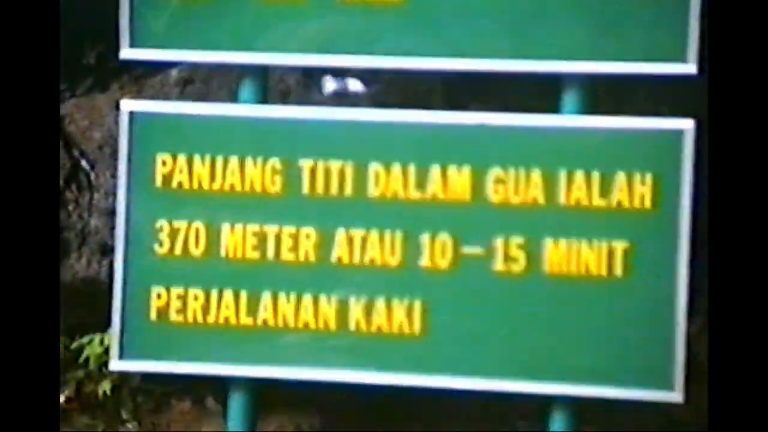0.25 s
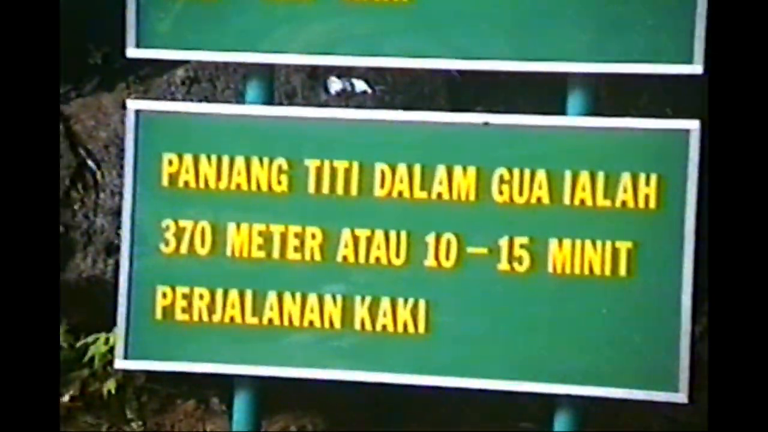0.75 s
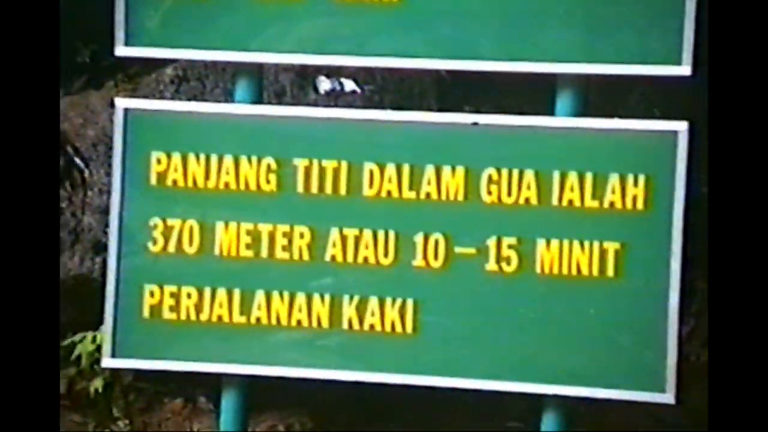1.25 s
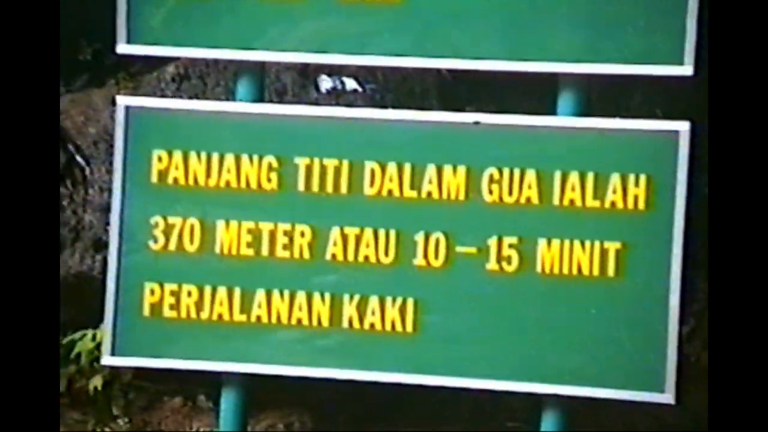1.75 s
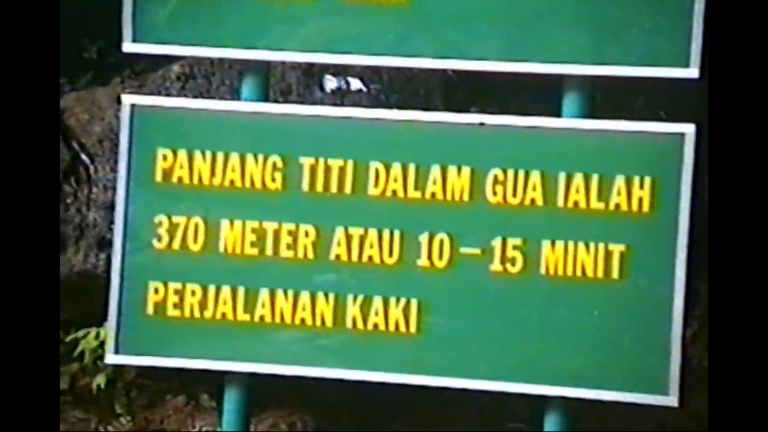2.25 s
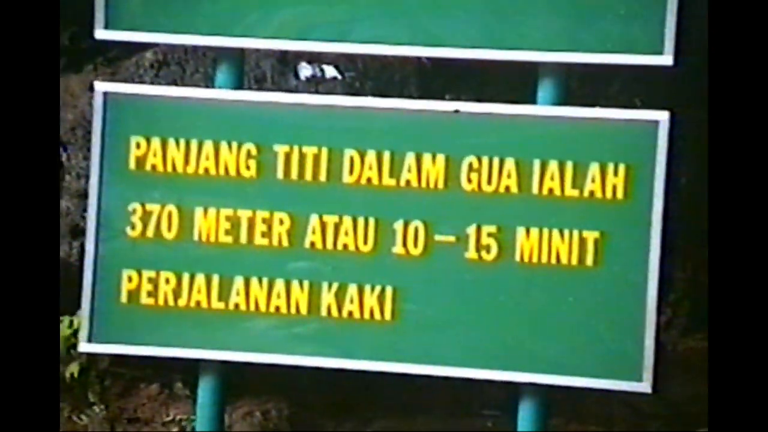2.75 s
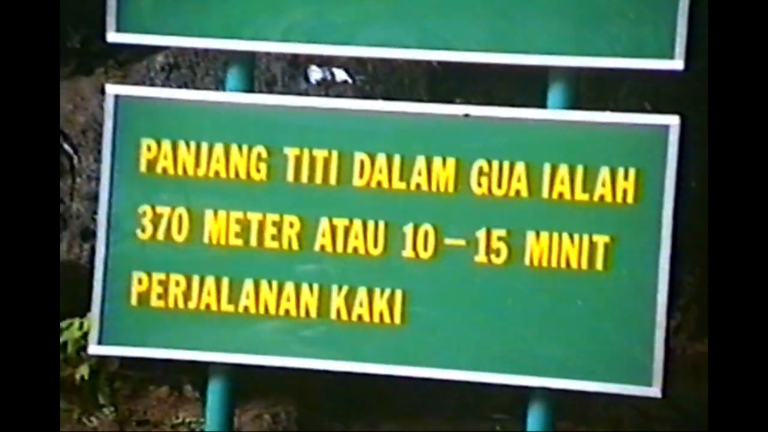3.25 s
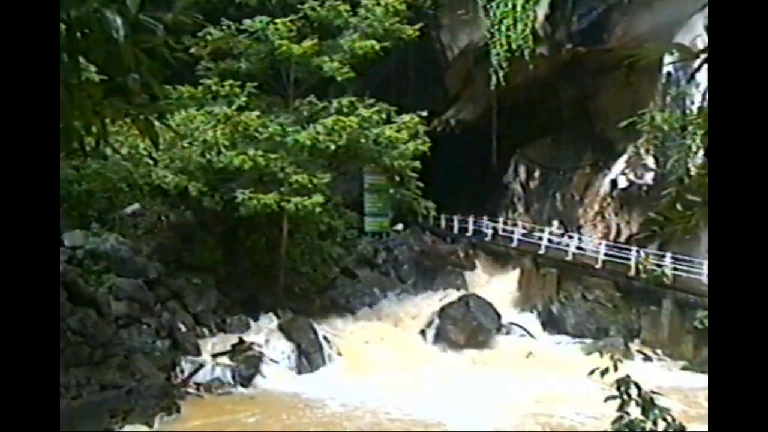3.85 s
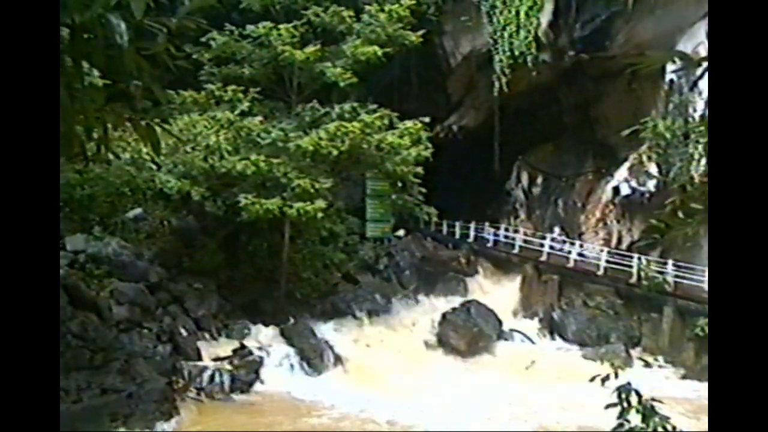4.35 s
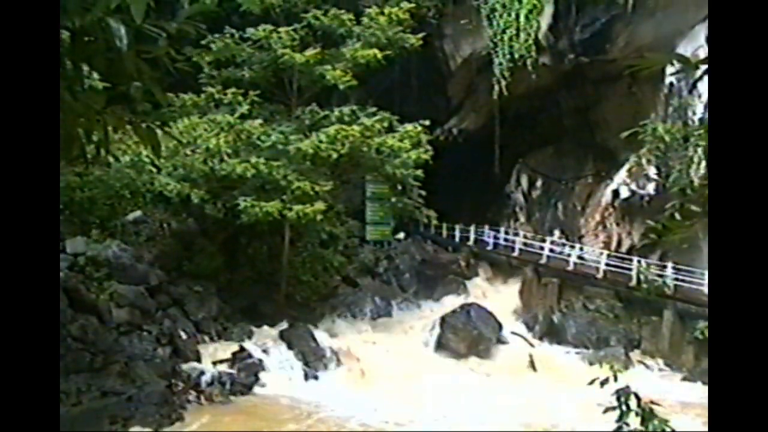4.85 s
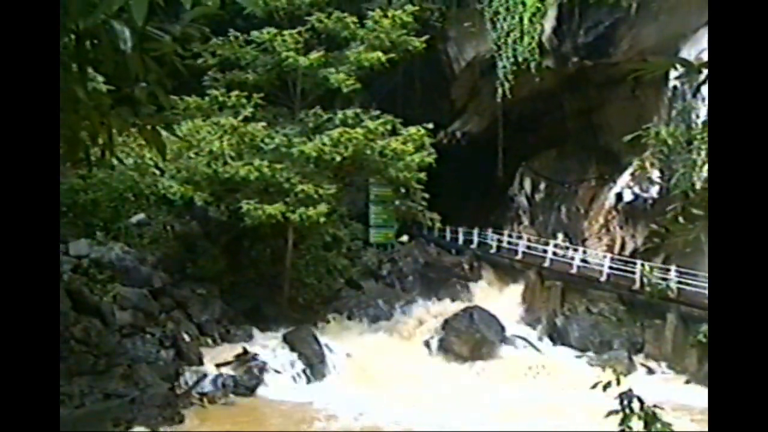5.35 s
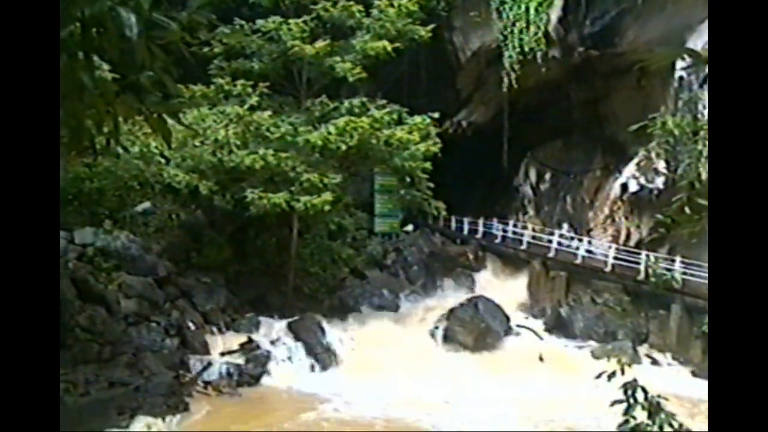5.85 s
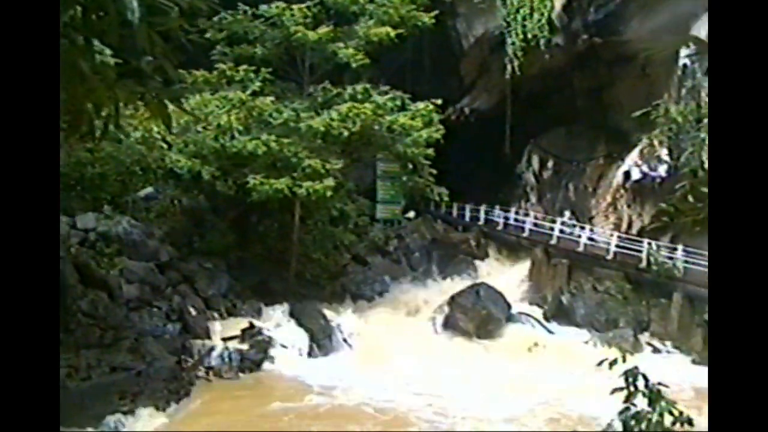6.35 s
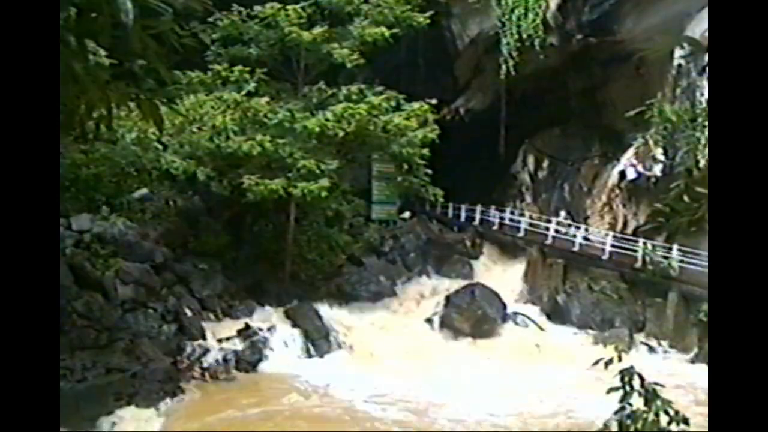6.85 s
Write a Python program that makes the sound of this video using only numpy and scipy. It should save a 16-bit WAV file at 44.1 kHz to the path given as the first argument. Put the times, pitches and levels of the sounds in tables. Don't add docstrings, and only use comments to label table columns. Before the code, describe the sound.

A flooded river roars dark and heavy over rocks, steady and distorted, then shifts near four seconds to a slightly weaker, brighter, splashier rush.

```python
import sys
import numpy as np
from scipy import signal
from scipy.fft import rfft, irfft, next_fast_len
from scipy.io import wavfile
from scipy.ndimage import uniform_filter1d, map_coordinates

SR = 44100
rng = np.random.default_rng(int(sys.argv[2]) if len(sys.argv) > 2 else 0)


def to_wav(sig):
    pcm = np.clip(np.atleast_2d(sig), -1, 1) * 32767
    pcm = np.round(pcm).astype(np.int16)
    wavfile.write(sys.argv[1], SR, pcm.T)


def natural_amplitude(level_db):
    exponent = np.asarray(level_db, float) / 20
    return 10 ** exponent


N = 312669

# [f/Hz, density/dB per Hz]
MOUTH_SPECTRUM = [(30, -59), (100, -11.5), (200, -2.5), (260, -3.5), (305, 1), (360, -1.5), (450, -0.5),
                  (600, -6.5), (1200, -11.5), (1900, -18.5), (3500, -30.5), (8000, -60)]
# [f/Hz, density/dB per Hz]
BANK_SPECTRUM = [(30, -45), (100, -12), (180, -2.5), (260, -1.5), (450, -4), (650, -8), (950, -8.5),
                 (1600, -17.5), (3500, -34), (8000, -51)]
# [f/Hz, density/dB per Hz]
SPRAY_SPECTRUM = [(600, -51), (1500, 0), (3000, 0.5), (6000, -3.5), (9000, -9.5), (16000, -14.5)]
# [t/s, plunge level/dB, extra churn level/dB, extra spray level/dB]
SURGES = [(0, 1.7, -2.2, -0.8), (.4, 0.5, 0.5, 0.5), (.8, 0.5, -1, 0), (1.2, 0.2, 1, 0.5),
          (1.65, -0.3, 0.1, -0.5), (2.15, -0.2, 0.5, 0.5), (2.4, .5, -1.3, 1), (2.7, -0.6, 0.6, -0.5),
          (3.15, 0.8, -2, -0.2), (3.45, -1.1, 2, 0), (3.75, -0.5, 1.9, 0), (4.1, 1, -1.1, -0.5),
          (4.7, 0.9, -0.5, 0), (5.2, -0.3, -.5, -0.5), (5.9, 0, .5, 0), (6.15, 0.5, -1.7, -0.8),
          (6.4, -0.7, 1.5, 0), (7.09, 1, -1, 0)]
# [f/Hz, gain/dB]
CHURN_BAND = [(450, -40), (700, 0), (2500, 0), (4000, -40)]
# [t/s, first sag/dB, second sag/dB]
SAG_GROUPS = [(.159, -.65, -.35), (.53, -.75, -.35), (2.132, -.85, -.9), (3.386, -.45, -.35),
              (3.99, -1.1, -.9), (4.524, -1.2, -1), (4.942, -.5, -.25), (5.314, 0, -.65), (5.638, -.5, -.1),
              (6.799, -1, -.8), (6.916, -.8, -.5)]
# [t/s, centre f/Hz, duration/blocks]
LOST_BANDS = [(.196, 11370, 1), (.217, 10000, 1), (.217, 14815, 1), (.54, 10680, 1), (.554, 11370, 2),
              (.554, 14125, 2), (.566, 15430, 1), (.855, 10680, .7), (2.168, 11370, 1), (2.168, 15430, 1),
              (2.18, 10000, 2), (2.18, 14125, 2), (2.191, 12060, 1), (3.4, 13435, 1), (3.412, 10000, 2),
              (3.422, 10680, 1), (4.052, 10000, 1), (4.538, 14815, 1), (4.548, 10000, 2), (4.558, 10680, 1),
              (4.968, 10000, 2), (4.979, 13435, 1), (5.304, 12745, 1), (5.304, 14125, 1), (5.304, 14815, 1),
              (5.316, 10000, 2), (5.338, 12060, 2), (5.667, 12745, .7), (5.674, 10680, 1),
              (5.686, 11370, 2), (5.702, 15430, 1), (6.848, 11370, 2.3), (6.859, 10000, 1),
              (6.931, 15430, 1), (6.949, 10680, 1), (6.976, 9305, 1)]
# [f/Hz, gain/dB]
UNSTEADY_BANDS = [
    [(75, -40), (90, 0), (165, 0), (190, -40)],
    [(10500, -40), (11500, 0), (20000, 0)],
]
# [f/Hz, gain/dB]
TAPE_RESPONSE = [(7000, -0.5), (9500, 0.5), (11000, -5), (13000, -10.5), (16000, -13), (21000, -30)]
# [f/Hz, density/dB per Hz]
FAINT_NOISE_SPECTRUM = [(3, -7), (30, 0.5), (120, -3), (300, -9.5), (1000, -11.5), (3000, -22.5),
                        (9000, -27), (16000, -40)]

OFFSET, CEILING = 0.899, 0.922
BLOCK_S = 1024 / SR


def river():
    t = np.arange(N) / SR
    change_s, change_takes_s = 3.79, 0.07
    bank = np.clip((t - change_s) / change_takes_s + 0.5, 0, 1)
    surge_s, *controls = np.transpose(SURGES)
    plunge_db, churn_db, splash_db = [np.interp(t, surge_s, control) for control in controls]
    roar_db = -18 + bank * (-20 + 18) + plunge_db
    spray_db = -30 + bank * (-26.5 + 30) + splash_db
    surge_db = 0.3 * wobble(14)
    foam = natural_amplitude(-14) * bubbles(count=5000, hz=900, cycles=9, spread_db=1.5)
    water = natural_amplitude(roar_db) * (plunge(bank, churn_db) + foam)
    return natural_amplitude(surge_db) * (water + natural_amplitude(spray_db) * spray())


def plunge(bank, churn_db):
    turn = np.pi / 2 * bank
    mouth_roar = rush(MOUTH_SPECTRUM, patchy_db=-0.25)
    bank_roar = rush(BANK_SPECTRUM, patchy_db=1.0)
    roar = np.cos(turn) * mouth_roar + np.sin(turn) * bank_roar
    return roar + (natural_amplitude(churn_db) - 1) * coloured(roar, CHURN_BAND)


def bubbles(count, hz, cycles, spread_db):
    draw = rng.random((count, 2))
    t = np.arange(700) / SR
    pitch = hz * np.exp(0.6 * rng.standard_normal((count, 1)))
    size = natural_amplitude(-spread_db * np.log(1 - draw[:, 1:]))
    turns = pitch * t
    ringing = np.sin(2 * np.pi * turns * (1 + 0.17 * turns / cycles))
    decay = natural_amplitude(-40 * turns / cycles)
    onset = 1 - np.exp(-turns)
    wave = size * ringing * decay * onset
    at = (draw[:, :1] * N).astype(int) + np.arange(len(t))
    return unit(np.bincount(at.ravel(), wave.ravel(), N + len(t))[:N])


def spray():
    return natural_amplitude(0.45 * wobble(22)) * rush(SPRAY_SPECTRUM, patchy_db=1)


def rush(spectrum, patchy_db):
    z = signal.stft(rng.standard_normal(N + 512), nperseg=512)[2]
    patches = uniform_filter1d(rng.standard_normal(z.shape), size=3, axis=0)
    patches = uniform_filter1d(patches, size=6, axis=1)
    noise = signal.istft(z * natural_amplitude(patchy_db * unit(patches)), nperseg=512)[1][:N]
    return unit(coloured(noise, spectrum))


def scene():
    return river()[None]


def sagging():
    sink_s, climb_s, snap_s = 0.007, 0.0055, 0.0005
    db = np.zeros(N + SR)
    t = np.arange(SR // 8) / SR
    sink = 1 - np.exp(-(t / sink_s) ** 2)
    for start_s, first_db, second_db in SAG_GROUPS:
        first_back_s = snap_s if first_db < -0.8 else climb_s
        sags = [(0, first_db, first_back_s), (1, second_db, climb_s), (3, -0.55, climb_s)]
        for blocks, depth_db, back_s in sags:
            recovery = np.exp(-(np.maximum(t - BLOCK_S, 0) / back_s) ** 2)
            start = round((start_s + blocks * BLOCK_S) * SR)
            db[start:][:len(t)] += depth_db * sink * recovery
    return natural_amplitude(db[:N])


def holed(x):
    hz, t, z = signal.stft(x, SR, nperseg=512, noverlap=384)
    gain = np.ones(z.shape[-2:])
    for s, centre_hz, blocks in LOST_BANDS:
        in_band = abs(hz - centre_hz) < 380
        in_time = abs(t - s) < 0.42 * blocks * BLOCK_S
        gain[np.ix_(in_band, in_time)] = natural_amplitude(-35)
    return signal.istft(z * gain, SR, nperseg=512, noverlap=384)[1][..., :N]


def unsteady(x, band, share, depth_db):
    lost = rng.random(int(N / SR / BLOCK_S) + 3) < share
    fade = map_coordinates(lost * 1., [np.arange(N) / SR / BLOCK_S], order=1)
    return x + (natural_amplitude(depth_db * fade) - 1) * coloured(x, band)


def flicker_db():
    knots = np.arange(N) * 150 / SR
    return 1.3 * map_coordinates(rng.standard_normal(int(knots[-1]) + 4), [knots])


def faint_noise():
    return natural_amplitude(-37.5) * unit(coloured(rng.standard_normal(N), FAINT_NOISE_SPECTRUM))


def coloured(x, points):
    m = next_fast_len(N + 8192)
    hz, db = np.transpose(points)
    log_f = np.log(np.fft.rfftfreq(m, 1 / SR) + 1)
    gain = natural_amplitude(np.interp(log_f, np.log(hz + 1), db))
    return irfft(rfft(x, m) * gain, m)[..., :N]


def wobble(rate):
    knots = rng.standard_normal(int(N * 40 / SR) + 4)
    return map_coordinates(knots, [np.arange(N) * min(rate, 39) / SR])


def unit(x):
    return x / np.sqrt(np.mean(x ** 2) + 1e-20)


def top_cut(x):
    return signal.sosfilt(signal.butter(12, 15715, fs=SR, output="sos"), x)


def record(dry):
    flat = np.minimum(dry + OFFSET, CEILING) - OFFSET
    noisy = holed(coloured(flat, TAPE_RESPONSE) + faint_noise())
    noisy = unsteady(noisy, UNSTEADY_BANDS[0], share=0.3, depth_db=-14)
    noisy = unsteady(noisy, UNSTEADY_BANDS[1], share=0.4, depth_db=0.5)
    noisy = noisy + (natural_amplitude(flicker_db()) - 1) * coloured(noisy, UNSTEADY_BANDS[1])
    mix = sagging() * (noisy + OFFSET)
    return top_cut(mix)


dry = scene()
out = record(dry)
to_wav(out)
```